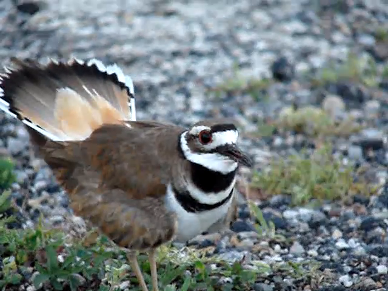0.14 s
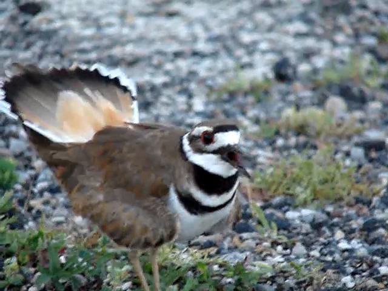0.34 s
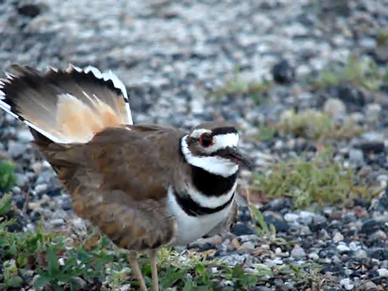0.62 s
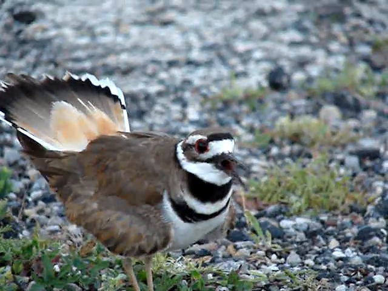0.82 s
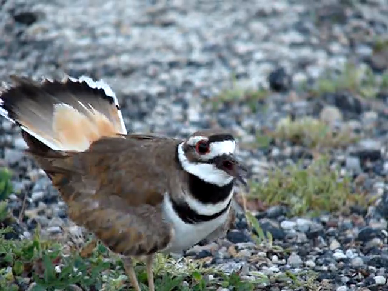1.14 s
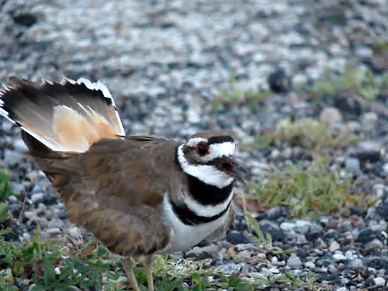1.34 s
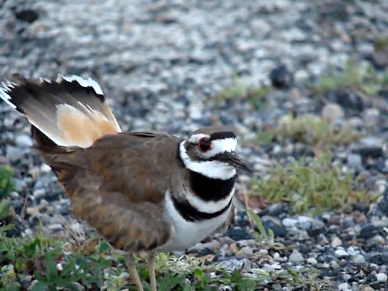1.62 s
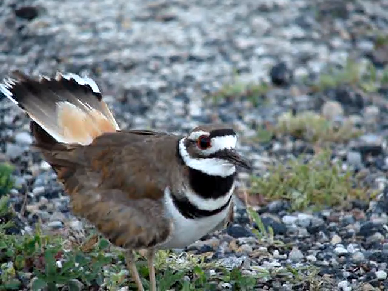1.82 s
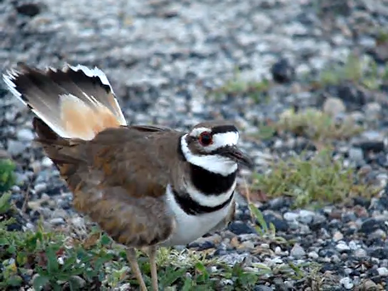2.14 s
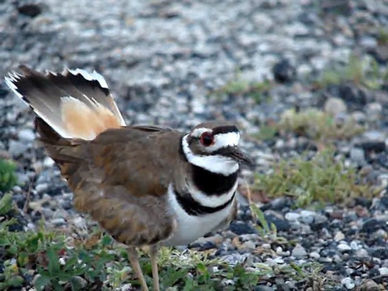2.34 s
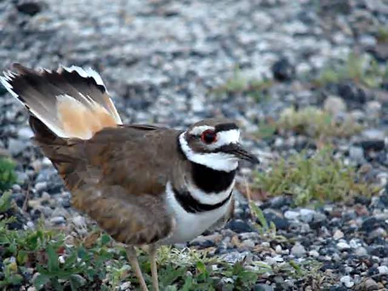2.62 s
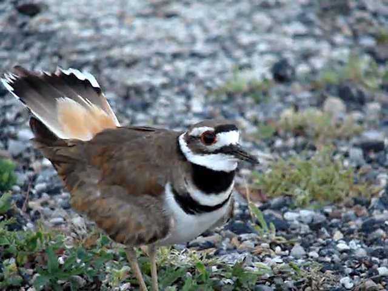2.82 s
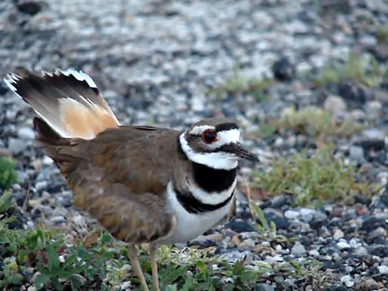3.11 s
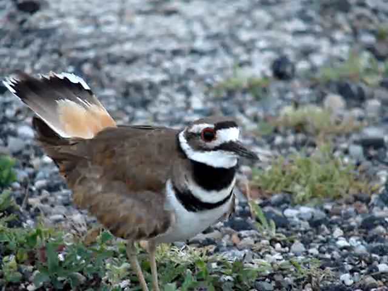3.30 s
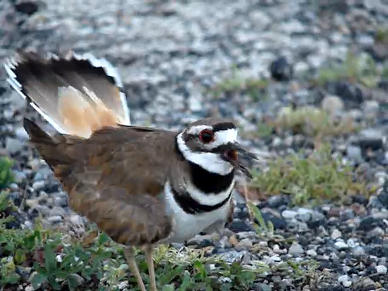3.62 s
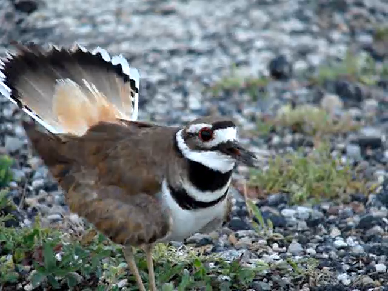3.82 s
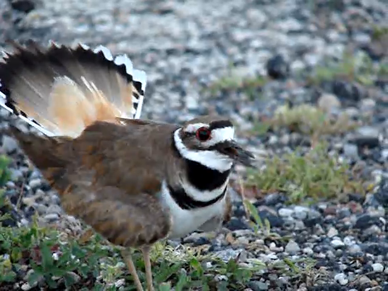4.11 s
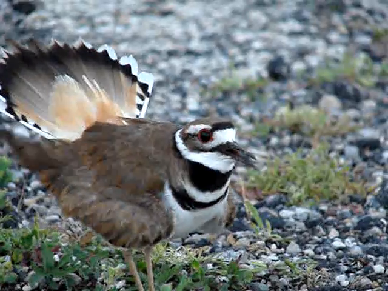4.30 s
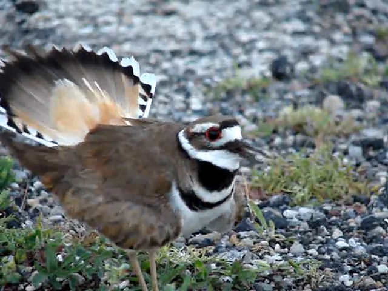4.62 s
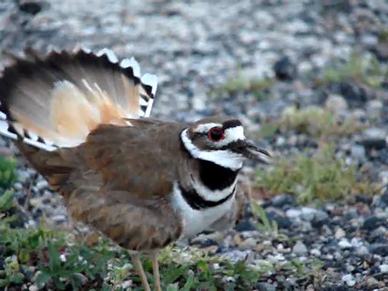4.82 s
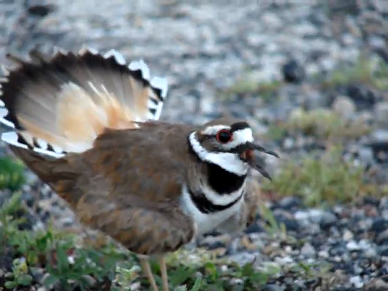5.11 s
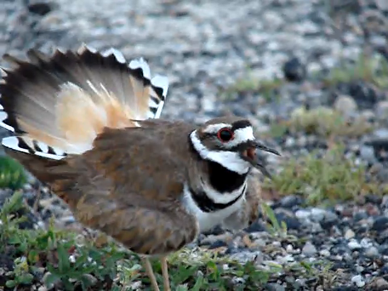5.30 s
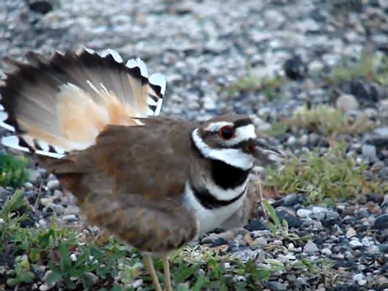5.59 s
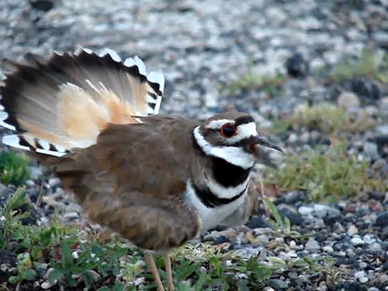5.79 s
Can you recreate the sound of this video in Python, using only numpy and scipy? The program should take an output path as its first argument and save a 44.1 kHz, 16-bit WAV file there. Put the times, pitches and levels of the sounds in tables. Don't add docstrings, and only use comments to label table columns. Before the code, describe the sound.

Outdoors on gravel, a small shorebird shrieks in clipped, near-pure whistles, each scooping up and slipping down. Two pauses expose low traffic wash, a faint engine hum, hiss, thin cricket chirps and a sharp stone tick. A distant mate slurs a soft whistle in the first gap. The last bout is louder against its background, brisker, and runs to the end. Close, dry, slightly gritty small-recorder sound.

```python
import sys
import numpy as np
from scipy import signal
from scipy.io import wavfile
from scipy.ndimage import uniform_filter1d

SR = 44100
rng = np.random.default_rng(int(sys.argv[2]) if len(sys.argv) > 2 else 0)


def to_wav(s):
    ch = np.atleast_2d(s).T
    pcm = np.round(np.clip(ch, -1, 1) * 32767)
    wavfile.write(sys.argv[1], SR, pcm.astype(np.int16))


def ratio(d):
    e = np.asarray(d, float) / 20
    return 10 ** e


N = 262386

# (start [s], length [s], aimed pitch of loudest partial [Hz], scoop share [0-1],
# doubling sets in after [s])
FIRST_BOUT = [(-0.02, 0.0584, 4545, 0.36, 0.027), (0.123, 0.055, 4588, 0.6, 0.023),
              (0.274, 0.0603, 4582, 0.61, 0.033), (0.42, 0.069, 4703, 0.62, 0.029),
              (0.576, 0.0587, 4591, 0.59, 0.029), (0.738, 0.0588, 4444, 0.62, 0.033),
              (0.89, 0.0768, 4669, 0.45, 0.016), (1.063, 0.047, 4135, 0.46, 0.03),
              (1.216, 0.0621, 4583, 0.58, 0.047), (1.37, 0.0597, 4597, 0.7, 0.039),
              (1.54, 0.049, 4132, 0.67, 0.03), (2.563, 0.0645, 4456, 0.65, 0.055)]
SECOND_BOUT = [(3.854, 0.0698, 4666, 0.12, 0.012), (3.982, 0.055, 4636, 0.16, 0.026),
               (4.096, 0.0593, 4658, 0.14, 0.03), (4.218, 0.0457, 4560, -0.0, 0.007),
               (4.326, 0.0659, 4631, 0.12, 0.026), (4.457, 0.0522, 4504, 0.18, 0.013),
               (4.576, 0.0537, 4516, 0.3, 0.006), (4.696, 0.0552, 4470, 0.14, 0.003),
               (4.818, 0.0609, 4557, 0.42, 0.003), (4.945, 0.0623, 4599, 0.21, 0.003),
               (5.072, 0.0545, 4584, 0.14, 0.003), (5.194, 0.0699, 4649, 0.02, 0.025),
               (5.328, 0.081, 4678, 0.16, 0.032), (5.473, 0.0538, 4596, 0.14, 0.01),
               (5.596, 0.0539, 4555, 0.16, 0.005), (5.721, 0.0488, 4480, 0.34, 0.008),
               (5.846, 0.0639, 4566, 0.31, 0.003)]
# (scoop time [s], sag [Hz/s], doubling level at 5/4 of pitch [dB rms],
# 3/4 line re 5/4 line [dB], doubling weakens under this aim [Hz])
BOUT_MANNER = [
    (.0229, 1900, -32, -9.5, 4600),
    (.0064, 1140, -30.5, -6, 4400),
]
# (time [s], loudest partial [Hz], level [dB rms])
LONG_NOTES = [
    [(2.063, 4211, -18), (2.07, 4345, -11), (2.078, 4435, -10), (2.152, 4476, -13), (2.173, 4551, -11),
     (2.186, 4410, -13), (2.192, 4248, -17), (2.198, 4033, -28)],
    [(3.614, 4285, -17), (3.62, 4363, -11), (3.63, 4497, -11), (3.689, 4538, -12), (3.738, 4657, -11),
     (3.768, 4475, -11), (3.775, 4322, -17), (3.78, 4125, -28)],
]
# (time [s], loudest partial [Hz], level [dB rms])
SOFT_NOTE = [
    (2.373, 3790, -25),
    (2.378, 3740, -22),
    (2.388, 3745, -19),
    (2.397, 3714, -21),
    (2.405, 3709, -36),
]
# (start [s], end [s], 5/4 line [dB rms], 3/4 line [dB rms])
LONG_DOUBLING = [
    (2.098, 2.187, -40.5, -57.5),
    (3.635, 3.65, -45, -56),
    (3.66, 3.693, -36, -55.5),
    (3.708, 3.735, -43.5, -58),
    (3.758, 3.777, -34, -44),
]
# (from [s], to [s], 5/4 line [dB rms], 3/4 line [dB rms])
EARLY_DOUBLING = (.005, .016, -43, -45)
# (multiple of pitch [1], level re 5/4 line [dB])
FAINT_LINES = [(.25, -26.5), (1.75, -31.5), (2.25, -22)]
# (side partial [Hz], level re loudest partial [dB])
THROAT = [(1850, -19), (2150, -20), (2250, -25.5), (5600, -29), (6000, -25.5), (6900, -25.5), (7500, -43.5),
          (7900, -49), (8400, -28.5), (8700, -32), (9200, -32.5), (9900, -53), (10300, -78.5)]
MATE_THROAT = [(1900, -16), (2200, -22), (5700, -39.5), (6500, -30), (7700, -26), (8800, -31.5),
               (9500, -60)]
# (time [s], loudest partial [Hz], level [dB rms])
MATE = [
    [(1.607, 4390, -34.5), (1.619, 4430, -30.5), (1.628, 4020, -41.5), (1.636, 3740, -37.5),
     (1.652, 3850, -36), (1.81, 4130, -42), (1.865, 4380, -28), (1.911, 4364, -29), (1.921, 4246, -33.5)],
    [(5.535, 4227, -39.5), (5.56, 4180, -34), (5.568, 4280, -37)],
]
# (time [s], loudest partial [Hz], level [dB rms])
MATE_LEAD_IN = [
    (5.415, 3950, -64),
    (5.469, 4050, -56),
    (5.52, 4180, -39),
]
# (time [s], level [dB])
CRICKET = [(.195, -59), (1.459, -61), (2.245, -58), (2.29, -57), (2.335, -56), (2.681, -63), (2.91, -66),
           (2.945, -58), (2.99, -55.5), (3.035, -55), (3.331, -67), (3.369, -54), (3.41, -55), (3.455, -53)]
# (time [s], peak level [dB], centre [Hz], width [Hz])
TICKS = [
    (2.452, -43, 2800, 1490),
    (3.165, -45.5, 4500, 1510),
    (3.183, -39.5, 4000, 2495),
    (3.187, -30, 5570, 4840),
    (1.475, -41.5, 2500, 3000),
    (5.795, -34, 2500, 3000),
]
# (time [s], pitch [Hz], level at neutral gain [dB rms])
HIGH_HUM = [
    (0.0, 147, -63),
    (0.6, 146, -64),
    (0.75, 155, -59),
    (0.89, 149, -59),
    (.93, 146, -68),
    (1.04, 141, -68),
    (1.154, 148.8, -57),
    (1.3, 134, -82),
]
LOW_HUM = [
    (1.2, 100.3, -85),
    (1.33, 100, -67),
    (1.8, 101, -72),
    (2.1, 108, -78),
    (2.42, 101.4, -66),
    (3.6, 104.5, -63),
    (3.7, 104.5, -68),
    (5.95, 106.7, -60),
]
# (frequency [Hz], level [dB/Hz])
TRAFFIC = [(20, -6), (35, -8.5), (70, -12), (130, -11), (300, -12.5), (600, -12), (900, -11.5), (1200, -15),
           (1800, -14), (2100, -22.5), (2600, -28)]
# (centre [Hz], width [Hz], level re traffic [dB])
DRONES = [(206, 16, -18.5), (410, 28, -14), (630, 40, -14), (687, 39, -11.5), (860, 30, -12.5),
          (1310, 150, -16), (1850, 50, -17)]
# (frequency [Hz], level [dB/Hz])
HISS = [(1800, -3.5), (2600, -4.5), (4500, -1), (8000, -9), (9800, -8)]
# (time [s], gain [dB])
GAIN = [
    (0, -3.5),
    (1.45, -.7),
    (1.6, 1.5),
    (2.9, 1.7),
    (3.61, 4.5),
    (3.625, -2),
    (4.0, -4.5),
    (5.95, -4.7),
]
# (time [s], step [dB])
THUMPS = [
    (.89, -55),
    (2.065, -37.5),
    (3.616, -31),
]

REST_HZ = 3518
FALL_S, FALL_SHARE, FALL_BEND = .0222, .468, 1.69
FULL_DB, FULL_HZ, SOFTER_DB_PER_HZ = -11.4, 4343, .0104
ONSET_DB, ONSET_S = -7.5, .001
FADE_S, FADE_DB, FADE_BEND = .02, -15, 2.05
ATTACK_DB_MS, RELEASE_DB_MS = 12, 2.8
BREATH_WANDER_DB = .55
DOUBLING_DB_PER_HZ, DOUBLING_STOPS_S = .075, .008
SQUEAK_DB, SQUEAK_LOSS_DB_PER_HZ = -18.5, .012
TRAFFIC_DB, HISS_DB, HISS_FOLLOWS_GAIN = -58.5, -59.3, .05
BLOCK_S = 576 / 22050
CUTOFF_HZ = 9950


def plover():
    notes = LONG_NOTES + [SOFT_NOTE]
    for bout, manner in zip((FIRST_BOUT, SECOND_BOUT), BOUT_MANNER):
        notes = notes + [short_note(*row[:4], manner) for row in bout]
    notes = sorted(notes)
    hz, level_db = in_time(notes, (ATTACK_DB_MS, RELEASE_DB_MS), snap_db=3.5)
    breath_db = level_db + BREATH_WANDER_DB * drift(50)
    voice, phase = whistle(hz, breath_db, flutter=0.075, wobble_hz=12, throat=THROAT, soft=0.55, full_db=-14)
    voice *= np.minimum(np.arange(N) / 60, 1)
    return band(voice + doubling(phase) + squeaks(notes), 700, 21000), level_db


def short_note(start_s, length_s, aim_hz, scoop, manner):
    scoop_s, sag_hz_per_s = manner[:2]
    t = np.linspace(0, length_s, num=40)
    span_hz = aim_hz - REST_HZ
    held_hz = aim_hz - scoop * span_hz * np.exp(-t / scoop_s) - sag_hz_per_s * t
    fall = np.clip(1 - (length_s - t) / FALL_S, 0, 1) ** FALL_BEND
    fade = np.clip(1 - (length_s - t) / FADE_S, 0, 1) ** FADE_BEND
    hz = held_hz - FALL_SHARE * span_hz * fall
    level_db = FULL_DB + SOFTER_DB_PER_HZ * np.minimum(held_hz - FULL_HZ, 0)
    level_db = level_db + ONSET_DB * np.exp(-t / ONSET_S) + FADE_DB * fade
    return list(zip(start_s + t, hz, level_db))


def whistle(hz, level_db, flutter, wobble_hz, throat, soft, full_db):
    hz = uniform_filter1d(hz, size=200)
    phase = 2 * np.pi * np.cumsum(hz + wobble_hz * drift(130)) / SR
    flutter_noise = rms_one(band(rng.standard_normal(N), 170, 360))
    tone = np.sin(phase) * (1 + flutter * ratio(1.2 * drift(8)) * flutter_noise)
    purer_db = soft * np.minimum(level_db - full_db, 0)
    for multiple in (.5, 1.5, 2, 2.5):
        side_db = np.interp(multiple * hz, *np.transpose(throat)) + purer_db + 0.66 * drift(170)
        tone += ratio(side_db) * np.sin(multiple * phase)
    return np.sqrt(2) * ratio(level_db) * tone, phase


def doubling(phase, fade_s=0.0037):
    t, out = np.arange(N) / SR, np.zeros(N)
    for start, end, upper_db, lower_db in doubling_spells():
        span = slice(max(round((start - fade_s) * SR), 0), round((end + fade_s) * SR))
        inside_s = np.minimum(t[span] - start, end - t[span])
        fade = np.clip(inside_s / (2 * fade_s) + .5, 0, 1) ** 2
        lines = [(5 / 4, upper_db), (3 / 4, lower_db)]
        lines += [(multiple, upper_db + db) for multiple, db in FAINT_LINES]
        out[span] += fade * sum(ratio(db) * np.sin(multiple * phase[span]) for multiple, db in lines)
    return np.sqrt(2) * out * ratio(1.5 * drift(150))


def doubling_spells():
    rows = list(LONG_DOUBLING)
    for bout, (_, _, upper_db, lower_re_db, weak_hz) in zip((FIRST_BOUT, SECOND_BOUT), BOUT_MANNER):
        for start, length, aim_hz, _, after in bout:
            db = upper_db + DOUBLING_DB_PER_HZ * min(aim_hz - weak_hz, 0)
            rows.append((start + after, start + length - DOUBLING_STOPS_S, db, db + lower_re_db))
    from_s, to_s, upper_db, lower_db = EARLY_DOUBLING
    for start, *_, after in SECOND_BOUT:
        if after > .02:
            rows.append((start + from_s, start + to_s, upper_db, lower_db))
    return rows


def squeaks(notes, lead_s=.0022):
    t, out = np.arange(-300, 200) / SR, np.zeros(N)
    shape = ratio(np.minimum(9000 * t, -6000 * t))
    for (s, hz, _), *_ in notes[1:]:
        cycles = 1.265 * hz * t - 25000 * t ** 2
        db = SQUEAK_DB - SQUEAK_LOSS_DB_PER_HZ * max(hz - 4100, 0)
        out[round((s - lead_s) * SR) - 300:][:500] += ratio(db) * shape * np.sin(2 * np.pi * cycles)
    return out


def mate_whistles():
    hz, level_db = in_time([MATE[0], MATE_LEAD_IN + MATE[1]])
    return whistle(hz, level_db, flutter=.11, wobble_hz=9, throat=MATE_THROAT, soft=0, full_db=-30)[0]


def far_echo(x, t60_s=1.0):
    t = np.arange(SR // 2) / SR
    scatter = rng.standard_normal(len(t)) * ratio(-60 * t / t60_s) * (t > .03)
    scatter /= np.sqrt(np.sum(scatter ** 2))
    return band(signal.fftconvolve(x, scatter)[:N], 3900, 6000)


def cricket():
    t = np.arange(SR // 4) / SR
    arch = np.sin(np.pi * np.minimum(t / .028, 1))
    chirp = np.sin(2 * np.pi * (4850 * t - 8000 * t ** 2)) * arch
    return place((s, ratio(db + 3) * chirp) for s, db in CRICKET)


def gravel_ticks():
    t, events = np.arange(SR // 4) / SR, []
    for s, db, hz, width_hz in TICKS:
        burst = rng.standard_normal(len(t)) * np.exp(-t / 0.00082)
        burst = band(burst, hz - width_hz / 2, hz + width_hz / 2)
        events.append((s, ratio(db) * burst / np.abs(burst).max()))
    return place(events)


def engine_hum(rows):
    hz, level_db = in_time([rows], (1.5, 1.5))
    phase = 2 * np.pi * np.cumsum(hz + 2.2 * drift(5.7)) / SR
    tone = np.sin(phase) + ratio(-10.5) * np.sin(2 * phase) + ratio(-7.5) * np.sin(3 * phase)
    return np.sqrt(2) * ratio(level_db + 2.6 * drift(10)) * tone


def traffic_wash():
    swell = drift(6.2)
    wash = banded_noise(TRAFFIC, 22, count=20, gain_db=lambda: 1.3 * drift(8.2) + 1.2 * swell)
    return wash + drones()


def drones():
    white = rng.standard_normal(N)
    out = np.zeros(N)
    for hz, width_hz, db in DRONES:
        out += ratio(db) * rms_one(band(white, hz - width_hz / 2, hz + width_hz / 2, order=1))
    return out


def recorder_hiss(gate):
    def gain_db():
        return drift(20) - gate * np.clip(20 + 9 * drift(30), 0, 40)
    return banded_noise(HISS, 1900, count=8, gain_db=gain_db)


def treble_gate(level_db, linger_s=.008):
    block = (np.arange(N) / SR / BLOCK_S + .3).astype(int)
    loud = level_db > -45
    loud |= np.roll(loud, round(linger_s * SR))
    return uniform_filter1d(1. * np.isin(block, block[loud]), size=130)


def offset_thumps():
    t = np.arange(SR // 4) / SR
    thump = (1 - np.exp(-t / .0015)) * np.exp(-t / 0.032)
    return place((s, ratio(db) * thump) for s, db in THUMPS)


def place(events):
    out = np.zeros(N + SR)
    for s, sound in events:
        out[round(s * SR):][:len(sound)] += sound
    return out[:N]


def rms_one(x):
    return x / np.sqrt(np.mean(x ** 2) + 1e-20)


def in_time(tables, edge_db_ms=(6.5, 5.5), snap_db=0):
    rows = []
    for table in tables:
        first, last = list(table[0]), list(table[-1])
        first[0] -= 0.063 / edge_db_ms[0]
        first[2] -= 70
        last[0] += 0.021 / edge_db_ms[1]
        last[2] -= 60
        knee = [*table[0][:2], table[0][2] + snap_db]
        rows += [first, knee, *table[1:], last]
    s, *columns = np.transpose(rows)
    return [np.interp(np.arange(N) / SR, s, column) for column in columns]


def drift(rate_hz):
    low_pass = signal.butter(2, rate_hz, fs=SR, output="sos")
    return rms_one(signal.sosfilt(low_pass, rng.standard_normal(N + SR))[SR:])


def band(x, low_hz, high_hz, order=2):
    return signal.sosfilt(signal.butter(order, [low_hz, high_hz], "band", fs=SR, output="sos"), x)


def banded_noise(spectrum, low_hz, count, gain_db):
    hz, level_db = np.transpose(spectrum)
    white = rng.standard_normal((2, N))
    edges = low_hz * 2 ** (np.arange(count + 1) / 3)
    out, power = np.zeros(N), 0
    for k, (low, high) in enumerate(zip(edges, edges[1:])):
        gain = ratio(np.interp(np.log(low * high) / 2, np.log(hz), level_db))
        part = gain * band(white[k % 2], low, high)
        power += np.mean(part ** 2)
        out += part * ratio(gain_db())
    return out / np.sqrt(power)


def scene():
    gain_db = np.interp(np.arange(N) / SR, *np.transpose(GAIN))
    bird, level_db = plover()
    mate = mate_whistles()
    gate = treble_gate(level_db)
    echo = ratio(gain_db - 45 - 25 * gate) * far_echo(bird + ratio(14.5) * mate)
    engines = ratio(gain_db) * (engine_hum(HIGH_HUM) + engine_hum(LOW_HUM))
    traffic = ratio(TRAFFIC_DB + gain_db) * traffic_wash()
    hiss = ratio(HISS_DB + HISS_FOLLOWS_GAIN * gain_db) * recorder_hiss(gate)
    small_events = cricket() + gravel_ticks() + offset_thumps()
    return (bird + mate + echo + small_events + engines + traffic + hiss)[None]


def recorder_grit(x, own_db=-25.5, below_db=-41, above_db=-29, tilt_db=8, patchy_db=3.5):
    grid = dict(nperseg=512, noverlap=384)
    power = np.abs(signal.stft(x[0], **grid)[2][5:255]) ** 2
    bands = power.reshape(50, 5, -1).max(axis=1)
    bands *= (bands > np.roll(bands, 1, axis=0)) & (bands > np.roll(bands, -1, axis=0))
    spread = ratio(own_db) ** 2 * bands
    spread[:-1] += ratio(below_db) ** 2 * bands[1:]
    spread[1:] += ratio(above_db) ** 2 * bands[:-1]
    spread *= ratio(tilt_db * np.log2(np.arange(1, 51) / 10))[:, None] ** 2
    columns = spread.shape[1]
    steps_db = patchy_db * np.minimum(rng.standard_normal((50, columns // 9 + 1)), 1)
    spread *= ratio(np.repeat(steps_db, 9, axis=1)[:, :columns]) ** 2
    gain = np.pad(np.sqrt(np.repeat(spread, 5, axis=0)), ((5, 2), (0, 0)))
    noise = signal.stft(rng.standard_normal(N), **grid)[2]
    noise /= np.sqrt(np.mean(np.abs(noise) ** 2))
    return signal.istft(gain * noise, **grid)[1][:N]


def top_cut(x):
    return signal.sosfilt(signal.butter(12, 10840, fs=SR, output="sos"), x)


def record(dry):
    low_pass = signal.ellip(10, .5, 70, CUTOFF_HZ, fs=SR, output="sos")
    mix = signal.sosfilt(low_pass, dry + recorder_grit(dry))
    return top_cut(mix)


dry = scene()
out = record(dry)
to_wav(out)
```